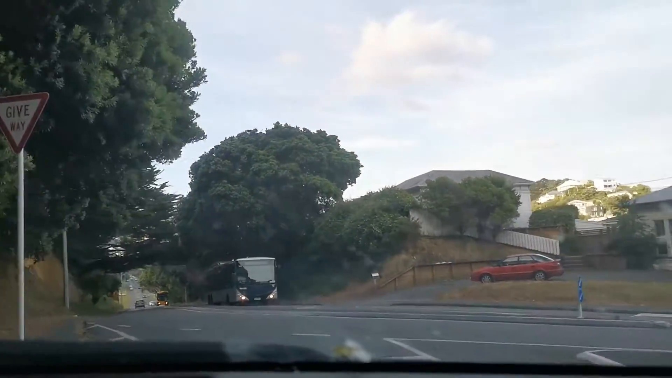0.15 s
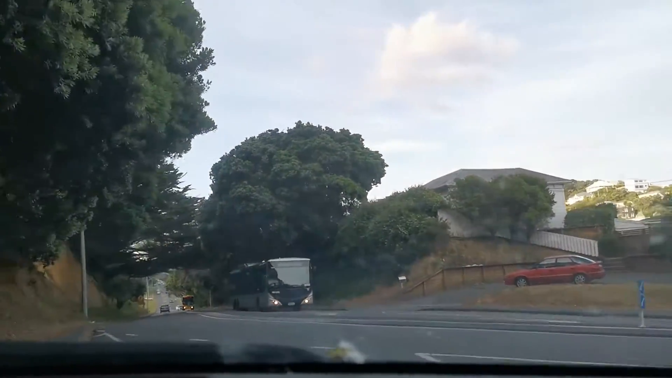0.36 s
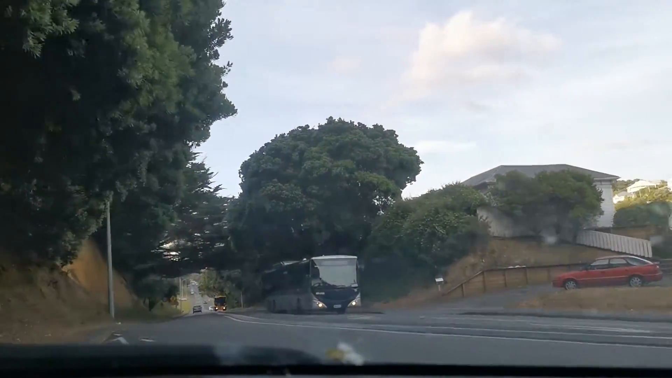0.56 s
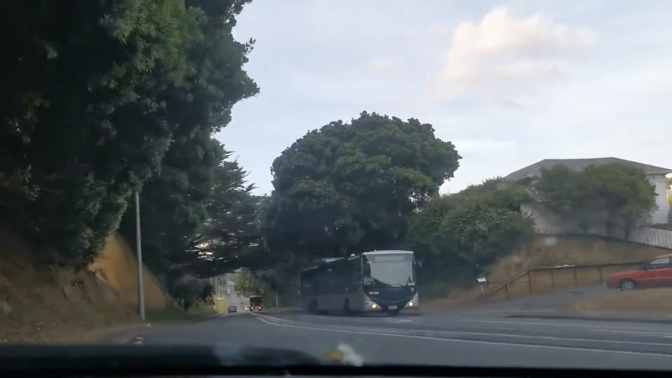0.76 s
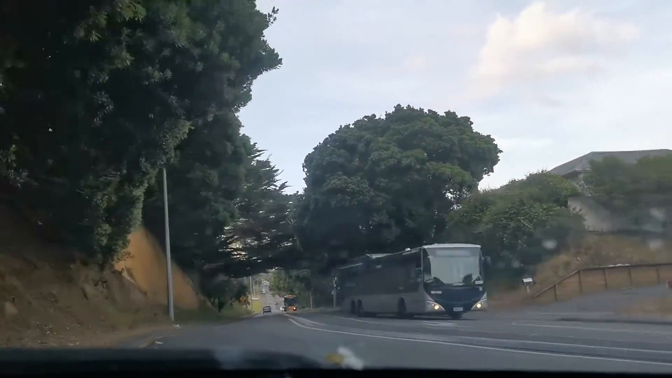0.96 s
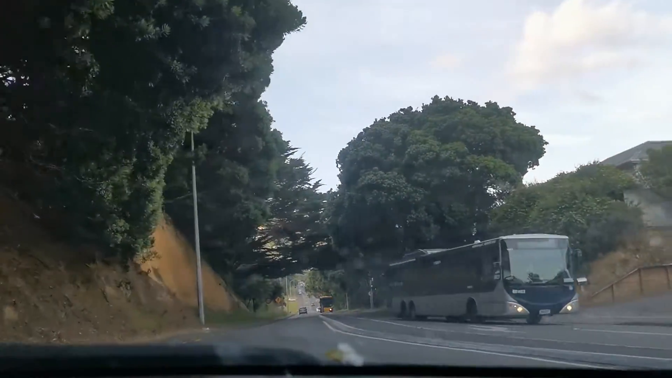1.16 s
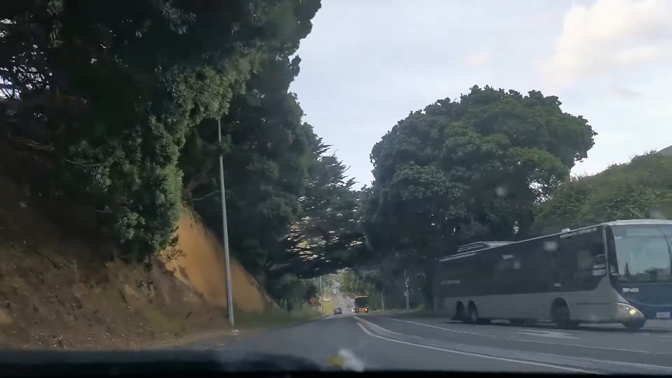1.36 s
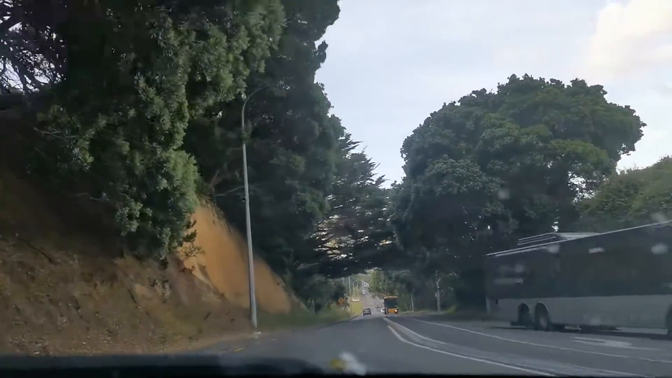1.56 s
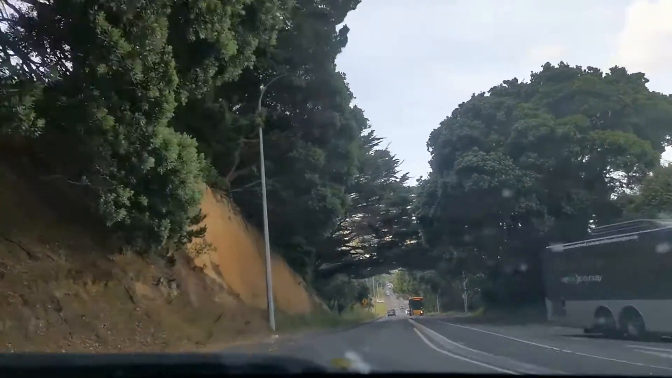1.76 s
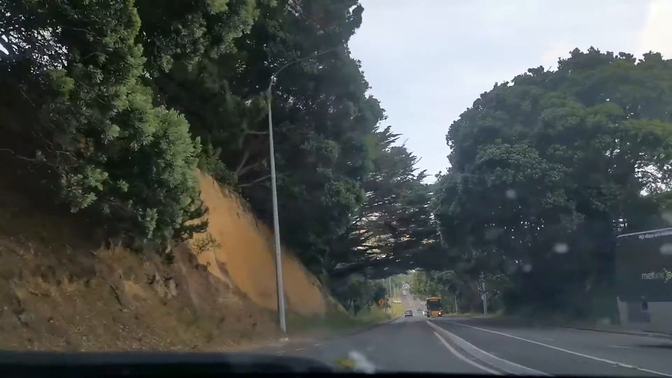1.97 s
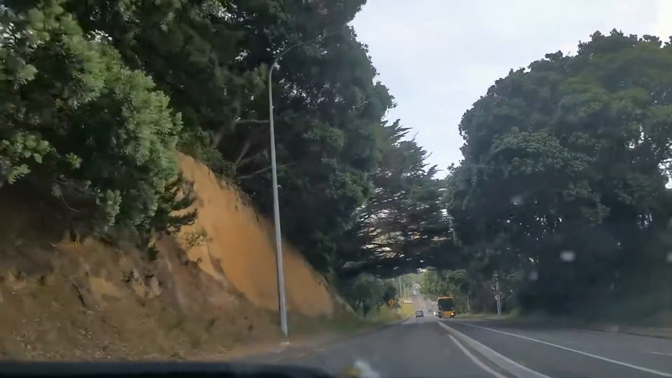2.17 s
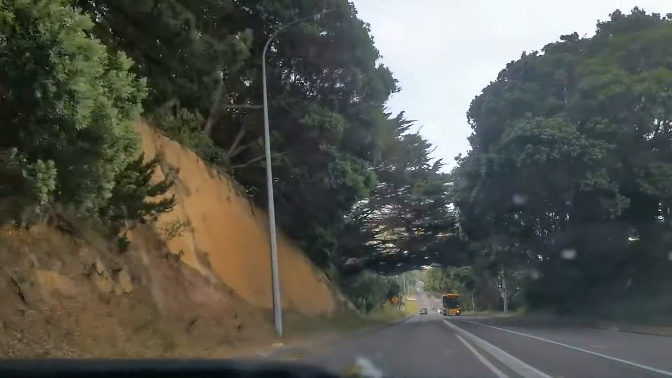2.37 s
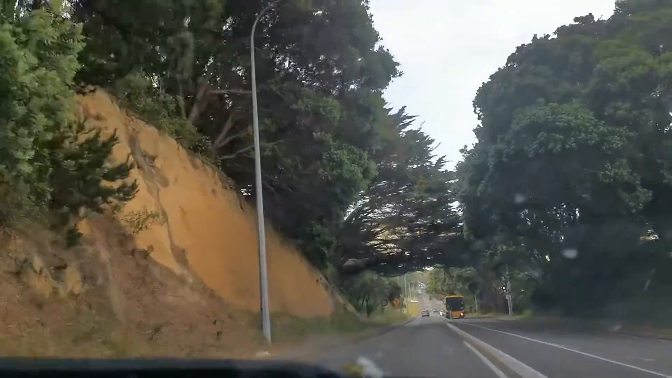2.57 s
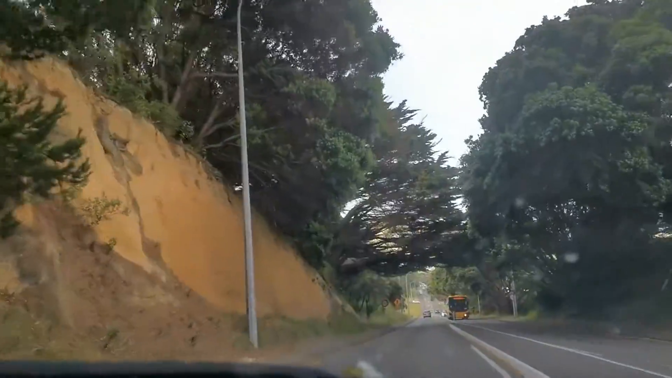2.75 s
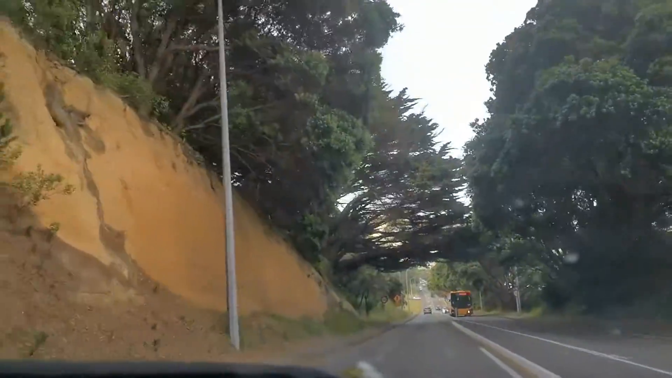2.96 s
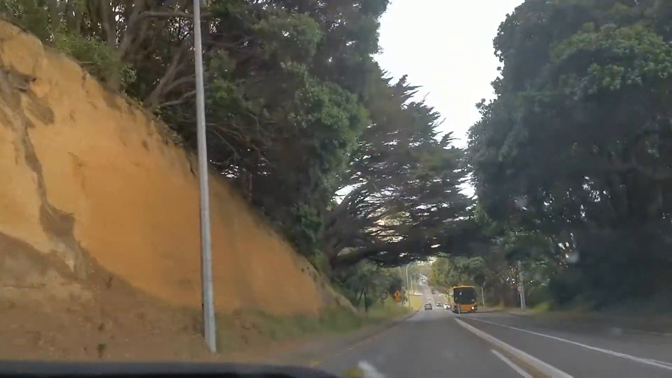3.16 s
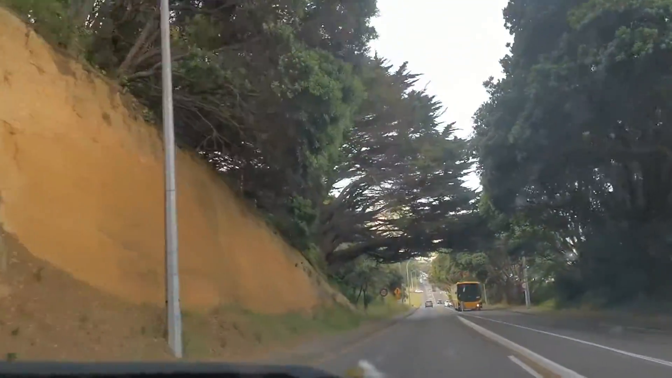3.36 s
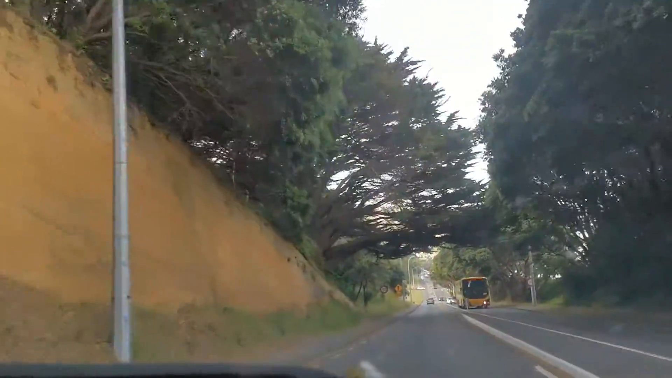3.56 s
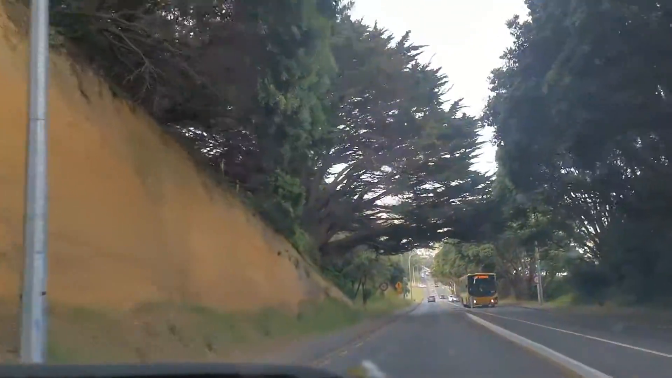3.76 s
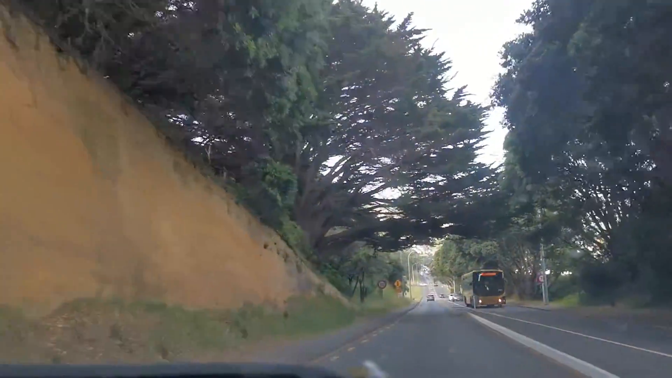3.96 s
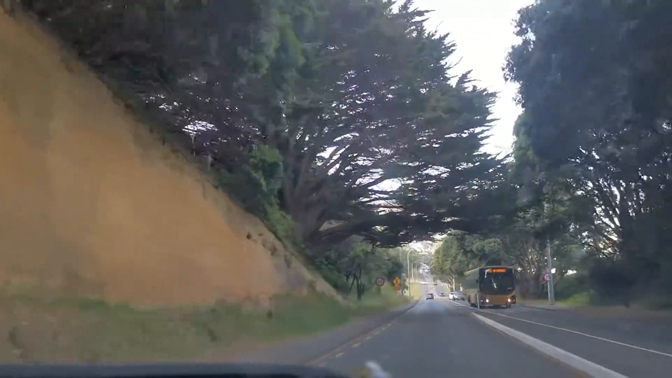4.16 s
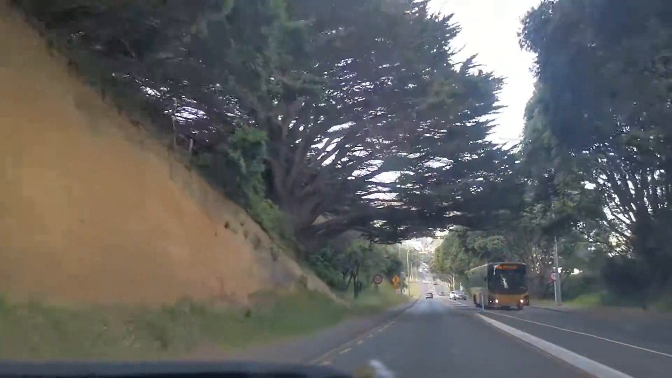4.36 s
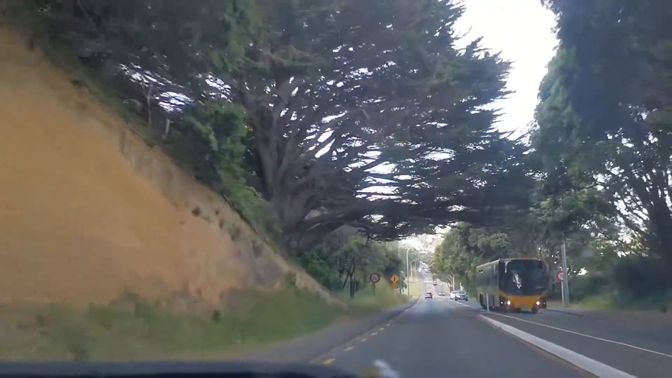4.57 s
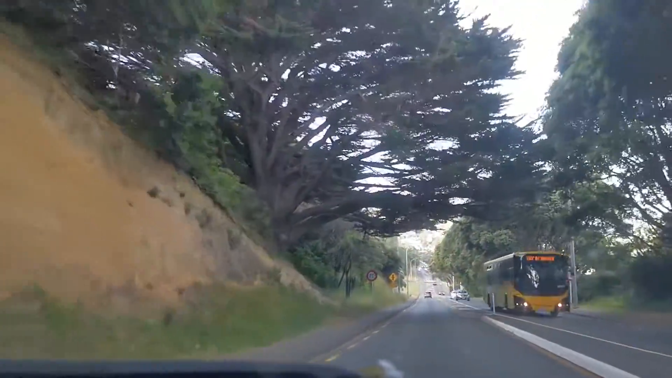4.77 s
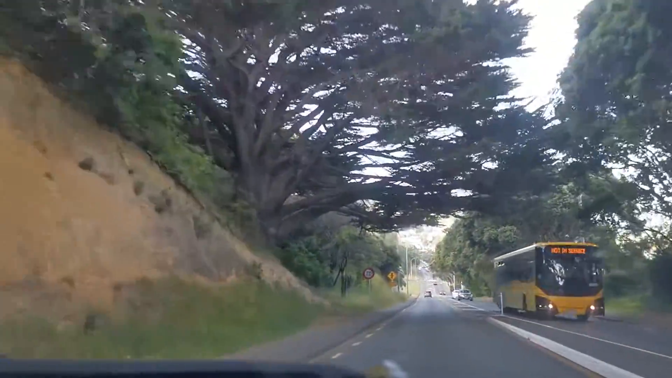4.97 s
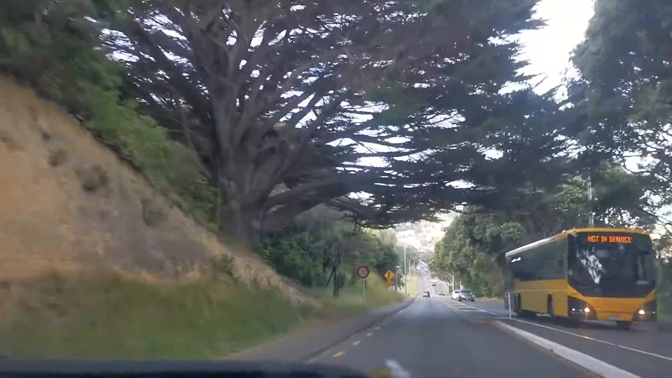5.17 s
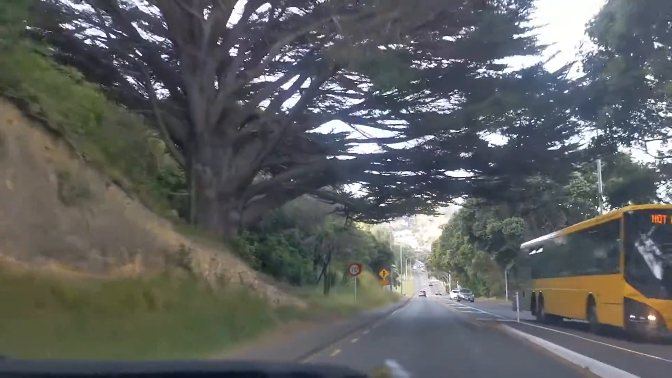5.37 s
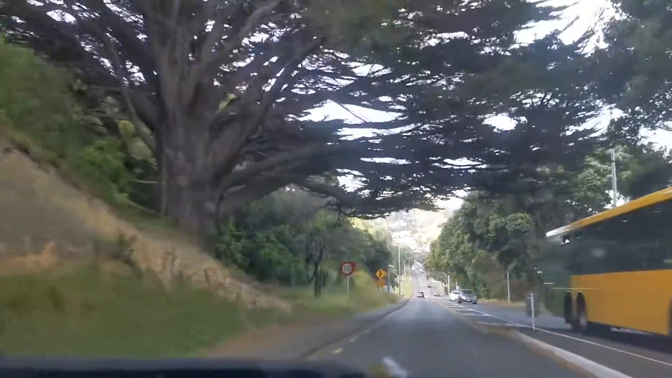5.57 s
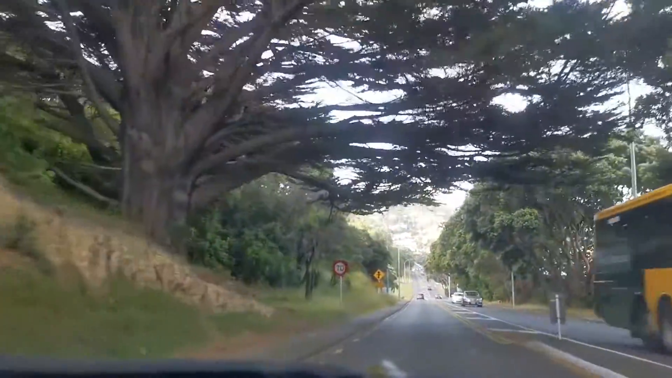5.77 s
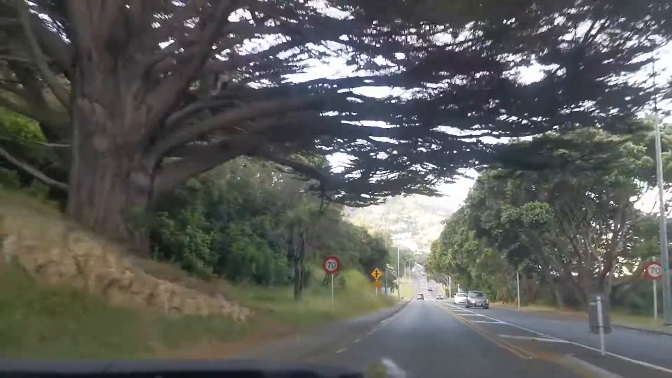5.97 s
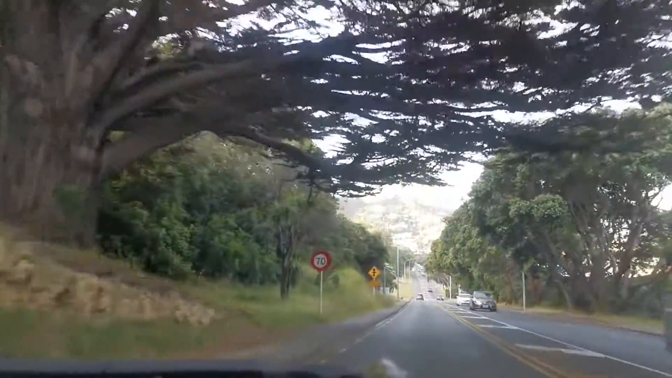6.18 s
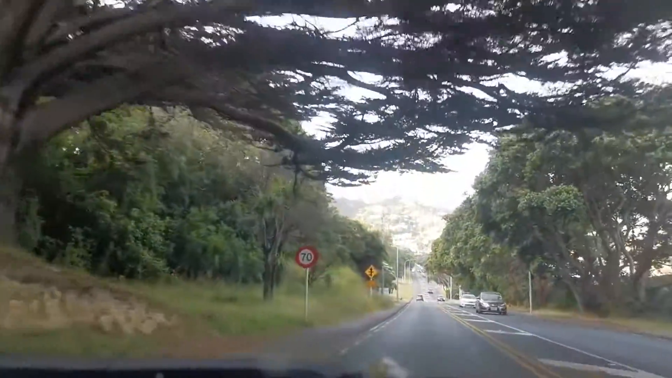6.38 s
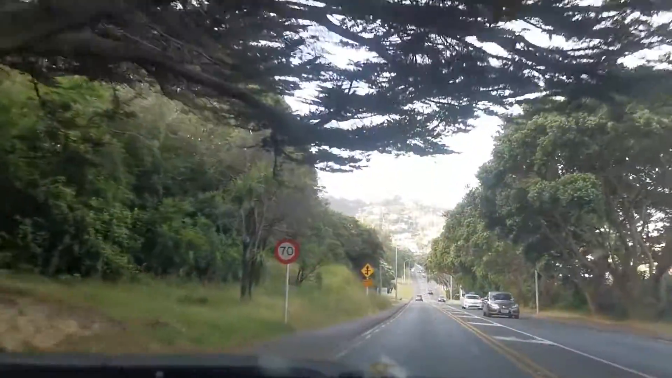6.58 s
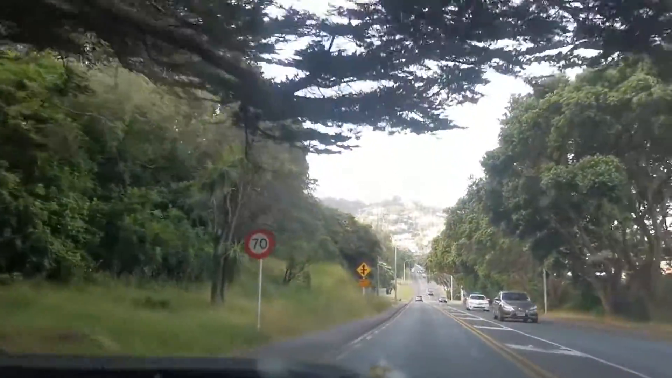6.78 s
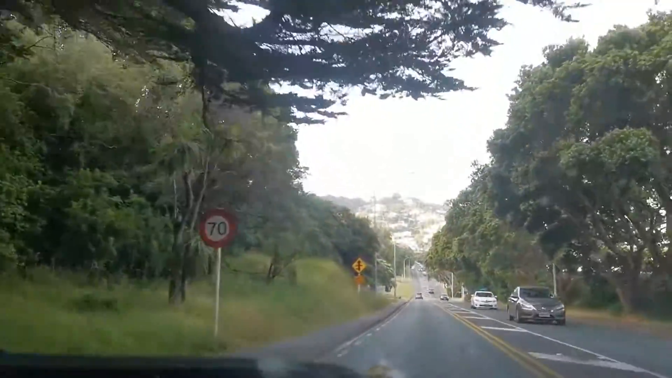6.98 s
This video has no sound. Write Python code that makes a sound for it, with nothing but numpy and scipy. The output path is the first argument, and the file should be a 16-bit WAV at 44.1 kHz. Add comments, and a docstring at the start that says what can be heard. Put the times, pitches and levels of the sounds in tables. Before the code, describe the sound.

Cabin sound heard from behind the windscreen: bassy road noise with gentle airy hiss thickens as the car gathers speed. First come quiet, steady indicator ticks and a quick plastic double snap, then a short rattling clatter as the stalk returns. Afterwards only driving remains, with a low motor-like hum swelling twice, a hollow tyre drone in the middle, bumps in the rumble and tiny loose trim clicks.

```python
"""Road noise fills a car that gathers speed: filtered noise in bands, swelling over rough patches of tarmac.
Wind, tread and vent hiss are brighter noise; drive hum, gear whine and tyre cavity are wavering tones and
narrow noise, with a low body boom. Relay ticks, a plastic catch, the clattering indicator stalk and loose trim
are ringing modes and noise bursts. It is heard through two close microphone ports behind the windscreen."""
import sys
import numpy as np
from scipy import signal
from scipy.fft import rfft, irfft, next_fast_len
from scipy.io import wavfile

SR = 44100
rng = np.random.default_rng(int(sys.argv[2]) if len(sys.argv) > 2 else 0)


def waveform_to_disk(signal):
    """Save audio, clipped to [-1, 1], as 16-bit WAV at the path in sys.argv[1]."""
    frames = np.transpose(np.atleast_2d(signal))
    scaled = np.clip(frames, -1, 1) * 32767
    samples = np.round(scaled).astype(np.int16)
    wavfile.write(sys.argv[1], SR, samples)


N = 310023  # samples, about 7 s

# Parts of the road noise: bounce, boom, drone and tyre roar; their summed power sets the road level.
# Each row: centre in Hz, level at speed in dB, how much quieter at rest in dB, build-up time in seconds.
ROAD_PARTS = [(35, -26, 2, 1.4), (100, -26.5, 10.5, 1.9), (192, -23.5, 6, 2.7), (550, -39.5, 11, 2.2)]
# Tone colour of the road noise. Each row: frequency in Hz, relative density in dB per Hz.
ROAD_COLOUR = [(12, -30.5), (20, 0), (31, 4), (50, 0.5), (63, -1.5), (88, -1), (105, -7), (140, -5.5),
               (172, -9), (230, -11), (320, -18.5), (380, -25), (600, -31.5), (770, -36.5), (890, -38.5),
               (1300, -52), (2200, -75)]
# Rougher and smoother patches of tarmac. Each row: centre in seconds, length in seconds,
# then the lift in dB of bounce, boom, drone and tyre roar.
TARMAC_PATCHES = [(0.029, 0.19, 4, 6.5, 0, 2), (0.257, 0.092, -6.5, -3.5, -3, -0.5),
                  (0.689, 0.5, 5.5, -1.5, 0.5, 2), (1.005, 0.099, -6, -3.5, 3, 1),
                  (1.153, 0.14, -2, 1.5, 2, 4.5), (1.415, 0.11, 9, 3.5, -0.5, 1),
                  (1.661, 0.099, 10, -5, 1.5, 1.5), (2.351, 0.1, 4, 9.5, 2, 0),
                  (2.622, 0.21, 3.5, 4.5, -2.5, 1.5), (3.258, 0.092, 3, -4, 0.5, -0.5),
                  (3.58, 0.13, 6, 1, 2, -1), (3.972, 0.13, 2.5, -4.5, -4, 1),
                  (4.272, 0.23, 3, 2, 2.5, -0.5), (4.703, 0.2, 0.5, 2.5, 1.5, -0.5),
                  (5.245, 0.081, 6, -4, 3, 0), (5.532, 0.057, 4.5, 10.5, 7.5, -1),
                  (5.714, 0.24, 3.5, 12.5, -4.5, -2.5), (6.013, 0.13, 6.5, 9.5, 0.5, 0.5),
                  (6.388, 0.1, 5, 4.5, 2, 0.5), (6.573, 0.043, 0, -6.5, -1, 0),
                  (6.752, 0.21, 1.5, 5.5, 6, -1), (6.947, 0.19, 8, 0, -1, -0.5)]
# How alike the noise is at the two ports. Each row: frequency in Hz, left-right correlation from 0 to 1.
PORT_LIKENESS = [(40, .996), (250, .994), (500, .97), (1000, 0.75), (1900, .8), (2400, .3), (3000, .5),
                 (4000, 0.25), (8000, 0.0)]

# Course of the wind and tread hiss. Each row: time in seconds, level in dB, treble lift in dB.
HISS_COURSE = [(0.0, -64.5, 0.5), (0.7, -63.5, 7.8), (0.99, -58, 1), (3.1, -60, 3.6), (4.09, -56.5, -1.8),
               (5.17, -54.5, 1), (5.56, -56.5, -4.2), (5.89, -57.5, -1.7), (6.32, -56.5, -0.2),
               (7.0, -56.5, -2.1)]
# Tone colour of the wind and tread hiss. Each row: frequency in Hz, relative density in dB per Hz.
HISS_COLOUR = [(700, -33.5), (1100, -1), (1250, -3), (1420, 0), (1620, -3), (1900, -1), (2100, -4.5),
               (2330, -9.5), (2800, -8), (3600, -14), (4300, -16.5), (5200, -21), (7000, -33),
               (12000, -56.5)]
# Tone colour of the vent hiss. Each row: frequency in Hz, relative density in dB per Hz.
VENT_COLOUR = [(2000, -25), (4000, -2), (5700, 2.5), (7000, 1), (9000, -5), (12000, -8), (15000, -12)]
TREBLE_FROM_HZ = 2300
VENT_DB, VENT_FADE_DB_PER_S = -79.3, 0.4

# Ring of the relay pulling in. Each row: frequency in Hz, relative level in dB, t60 in seconds.
RELAY_IN_MODES = [(1330, 4, 0.0081), (2230, 0.5, 0.025), (3000, 2, 0.0091), (3330, -4, .01),
                  (3610, 3, 0.018), (3770, 1.5, 0.017), (5730, -11, 0.022), (6480, -12, 0.016),
                  (7400, -35, 0.012), (7610, -15, 0.011)]
# Ring of the relay dropping out. Each row: frequency in Hz, relative level in dB, t60 in seconds.
RELAY_OUT_MODES = [(2240, 1, 0.014), (2600, 8, 0.018), (2980, 8, 0.0086), (3300, 7.5, 0.011),
                   (3570, -4, 0.013), (3930, 1, 0.015), (7640, -24, 0.013), (7620, -11, 0.013)]
RELAY_START_S, RELAY_STEP_S, RELAY_TICKS = 0.1193, 0.3427, 5
RELAY_IN_DB, RELAY_OUT_DB = -44, -43.5  # reference levels; each layer is offset from them
CONTACT_S = 0.003  # a blow builds up as fast as a ring of this t60 dies

# Snaps of a plastic catch. Each row: time in seconds, reference level in dB, treble over bass in dB.
CATCH_SNAPS = [(0.2375, -21.5, 13), (0.262, -20.5, -13.5)]
# Ring of the catch. Each row: frequency in Hz, relative level in dB, t60 in seconds.
CATCH_MODES = [(1490, -16, 0.026), (1810, -7.5, 0.012), (2360, -6, .01), (2690, -2, 0.015),
               (2910, 3, 0.019), (3140, 1, 0.013), (4020, -13, 0.0054), (4770, -2, 0.011),
               (5300, -13, 0.0068), (6230, 1, 0.009), (6560, -3, 0.0098), (7700, -9, 0.014)]

# Ticks of loose trim. Each row: time in seconds, reference level in dB.
TRIM_TICKS = [(0.368, -58), (0.7654, -59), (1.234, -54.5), (1.394, -53.5), (1.596, -55), (1.9789, -59),
              (2.0627, -56), (2.28, -58), (2.352, -62), (3.512, -57), (3.7576, -60), (3.8221, -53),
              (3.848, -58), (3.9049, -60), (3.9736, -64), (4.121, -58), (4.394, -61), (4.6691, -61),
              (5.3653, -60), (5.4, -63), (5.404, -61.5), (5.455, -67.5), (5.531, -62), (5.5363, -57),
              (5.5698, -60.5), (5.7009, -69), (6.2404, -55.5)]
TRIM_T60_S = 0.009

WHINE_S, WHINE_HZ, WHINE_DB, WHINE_FADE_DB_PER_S = 0.57, 2670, -67.5, 2

# Pulls of the drive. Each row: start in seconds, end in seconds, starting rate in Hz,
# then the level in dB of the first, third and fifth multiple.
HUM_PULLS = [(0.802, 2.384, 125.5, -34.5, -47.5, -51.5), (4.043, 5.052, 143.2, -28, -46.5, -53)]
# Swell-in time in seconds of the first, third and fifth multiple: the higher ones take longer.
HUM_RISE_S = [0.28, 0.48, 0.88]
HUM_HZ, HUM_SETTLE_S, HUM_CREEP_HZ_PER_S = 141.14, 0.15, 3.1
HUM_FALL_S, HUM_DROOP_HZ = 0.15, 6.9
HUM_WAVER_HZ, HUM_FLUTTER_DB = 0.7, 3.2

# The stalk rattling back over its detents. Each row: time in seconds, reference level in dB,
# treble over bass in dB.
STALK_KNOCKS = [(1.6314, -26.5, 3), (1.6484, -19.5, 5), (1.6506, -19.5, 9), (1.655, -27.5, -8),
                (1.6763, -21, 7), (1.6841, -29, 7), (1.692, -24.5, 4), (1.701, -28, -1), (1.713, -26, -3),
                (1.721, -28, -8), (1.733, -34, -10), (1.752, -43.5, -20)]
# Ring of the stalk's plastic. Each row: frequency in Hz, relative level in dB, t60 in seconds.
PLASTIC_MODES = [(1200, -3, 0.015), (1480, 2, 0.015), (1853, 0.5, 0.026), (2180, -2, 0.011),
                 (2980, -4, 0.0066), (3930, -12, 0.0055), (4930, 3, 0.0087), (5530, -11, 0.0061),
                 (6060, -16, 0.006), (6700, -19, .01), (6940, -17, 0.01)]
# The column thumping under each detent. Each row: frequency in Hz, relative level in dB, t60 in seconds.
COLUMN_MODES = [(343, 2.5, 0.052), (390, 4, 0.067), (489, -3, 0.048), (544, -14.5, 0.027), (720, -8, 0.033)]
# loose chatter under the rattle: it rises, holds and dies, quieter by the edge level at both ends
CHATTER_S, CHATTER_RISE_S, CHATTER_HOLD_S, CHATTER_FALL_S = 1.64, 0.02, 0.06, 0.035
CHATTER_DB, CHATTER_EDGE_DB, CHATTER_COUNT = -38, -17, 60

# Drone of the air in the tyre. Each row: time in seconds, pitch in Hz, level in dB.
CAVITY_COURSE = [(1.95, 200.6, -45), (2.1, 197.9, -30), (2.3, 194.4, -33.5), (2.5, 192, -32),
                 (2.6, 192, -33), (2.75, 187.6, -29), (2.95, 191, -24.5), (3.2, 185.8, -27.5),
                 (3.33, 186, -29.5), (3.43, 187.2, -43.5), (3.55, 190, -22), (3.85, 190.6, -23.5),
                 (3.95, 191, -39), (4.15, 195.9, -34.5), (4.4, 195.3, -39), (4.85, 192, -32),
                 (5.05, 190.6, -51)]
BOOM_S, BOOM_END_S, BOOM_HZ, BOOM_DB = 2.43, 5.05, 124.9, -31.5

CABIN_T60_S, CABIN_WET_DB = 0.05, -3.5
CROSS_HZ, CROSS_SHARPNESS, CROSS_DB = 2450, 8.0, 4.5  # air swinging between dash and glass
UNLIKE_LOW_HZ, UNLIKE_HIGH_HZ = 2200, 6500  # the tail differs between the ports mostly in this band
DRIVE_LAG_S, DRIVE_LEFT_DB = 0.00005, 0.85  # left port against right
CLICKS_LAG_S, CLICKS_LEFT_DB = 0.000025, 1.3
PORT_HZ, PORT_SHARPNESS, PORT_DB = 7650, 8, 15
PORT_EDGE_HZ, CUTOFF_HZ = 7570, 15100


def from_db(db):
    """Gain of a level in dB."""
    return 10 ** (np.asarray(db) / 20)


def rms_one(x):
    """Scale a signal to unit rms."""
    return x / np.sqrt(np.mean(x ** 2) + 1e-20)


def in_time(rows):
    """Draw each column of a timed curve as one value a sample."""
    s, *columns = np.transpose(rows)
    return [np.interp(np.arange(N) / SR, s, column) for column in columns]


def at_hz(points, hz):
    """Read a spectrum on a log-frequency axis."""
    point_hz, value = np.array(points).T
    return np.interp(np.log(hz), np.log(point_hz), value)


def drift(rate):
    """Slow random wander of unit rms: noise through two equal poles at the given rate in Hz."""
    step = 40  # samples between the slow values
    r = np.exp(-2 * np.pi * rate * step / SR)
    noise = rng.standard_normal(N // step + 2002)
    slow = signal.lfilter([1], [1, -2 * r, r * r], noise)[2000:]  # drop the filter's run-in
    return np.interp(np.arange(N) / step, np.arange(len(slow)), rms_one(slow))


def noise_bands(spectrum, centres, patchy_db, patch_rate):
    """Split stereo noise, total rms 1, into overlapping bands that then flicker singly; yields (Hz, band)."""
    size = next_fast_len(N)
    hz = np.maximum(np.arange(size // 2 + 1) * SR / size, 1)
    alike = np.clip(at_hz(PORT_LIKENESS, hz), 0, 1)
    mid, side = rfft(rng.standard_normal((2, size))) * from_db(at_hz(spectrum, hz))
    pair = np.sqrt(1 + alike) * mid + np.sqrt(1 - alike) * side * [[1], [-1]]
    pair = pair / np.std(irfft(pair, size))
    for k, centre in enumerate(centres):
        share = np.interp(np.log(hz), np.log(centres), np.arange(len(centres)) == k)
        band = irfft(pair * share, size)[:, :N]
        yield centre, band * from_db(patchy_db * drift(patch_rate))


def road():
    """Tarmac noise builds up and swells on patches; each band follows the two parts nearest in pitch."""
    t = np.arange(N) / SR
    part_hz, speed_db, rest_db, build_s = np.transpose(ROAD_PARTS)
    parts_db = speed_db[:, None] - rest_db[:, None] * np.exp(-t / build_s[:, None])
    for s, length, *lift_db in TARMAC_PATCHES:
        bump = np.exp(-0.5 * (2 * (t - s) / length) ** 2)
        parts_db = parts_db + np.array(lift_db)[:, None] * bump
    power = np.mean(from_db(parts_db) ** 2, axis=1)
    swell_db = parts_db - 10 * np.log10(power)[:, None]
    out = 0
    for hz, band in noise_bands(ROAD_COLOUR, np.geomspace(25, 1000, 12), patchy_db=1.58, patch_rate=7.5):
        weights = [np.interp(np.log(hz), np.log(part_hz), one) for one in np.eye(len(ROAD_PARTS))]
        out = out + band * from_db(weights @ swell_db)
    return out * np.sqrt(power.sum())


def hiss():
    """Wind and tread hiss is broadband noise whose level and treble move along a drawn curve."""
    level_db, treble_db = in_time(HISS_COURSE)
    bands = noise_bands(HISS_COLOUR, np.geomspace(1000, 8000, 8), patchy_db=2.1, patch_rate=1.4)
    return sum(band * from_db(level_db + treble_db * (hz > TREBLE_FROM_HZ)) for hz, band in bands)


def vent():
    """Vent hiss is bright, flickering noise that eases slowly."""
    level_db = VENT_DB - VENT_FADE_DB_PER_S * np.arange(N) / SR
    bands = noise_bands(VENT_COLOUR, np.geomspace(3500, 13000, 6), patchy_db=5.5, patch_rate=11.0)
    return from_db(level_db) * sum(band for hz, band in bands)


def ring(clicks, hz, t60):
    """A two-pole resonator: a unit click sets a dying sine of height about 1 ringing."""
    r, w = np.exp(-np.log(1000) / (t60 * SR)), 2 * np.pi * hz / SR
    return signal.lfilter([0, np.sin(w)], [1, -2 * r * np.cos(w), r * r], clicks + 1e-18)


def click_train(times, levels_db, signs=1):
    """Single-sample clicks at the given times."""
    clicks = np.zeros(N)
    clicks[np.round(np.asarray(times) * SR).astype(int)] = signs * from_db(levels_db)
    return clicks


def strike(times, levels_db, modes, spread_db, tilt_db=0):
    """Every blow rings all modes with fresh strengths and signs; tilt shifts weight to the high modes."""
    out = np.zeros(N)
    for hz, mode_db, t60 in modes:
        sign_draw, strength_draw = rng.normal(0, 1, (2, len(times)))
        brighter_db = tilt_db * np.tanh(np.log(hz / 4000) / 0.12) / 2
        blow_db = levels_db + mode_db + brighter_db + spread_db * strength_draw
        clicks = click_train(times, blow_db, np.sign(sign_draw))
        out += ring(clicks, hz, t60) - ring(clicks, hz, CONTACT_S)  # soft onset
    return out


def crack(times, levels_db, t60, low_hz, high_hz=11000):
    """A burst of band-passed noise swells and dies after each blow."""
    clicks = click_train(times, levels_db) + 1e-18
    fall, rise = [signal.lfilter([1], [1, -np.exp(-np.log(1000) / (s * SR))], clicks)
                  for s in (t60, CONTACT_S)]
    band = signal.butter(2, [low_hz, high_hz], "band", fs=SR, output="sos")
    return signal.sosfilt(band, (fall - rise) * rng.standard_normal(N))


def relay():
    """Indicator relay: pull-in and drop-out alternate at a steady pace, each with its own ring."""
    s = RELAY_START_S + RELAY_STEP_S * np.arange(RELAY_TICKS)
    pull_in, drop_out = s[::2], s[1::2]
    rings = strike(pull_in, RELAY_IN_DB, RELAY_IN_MODES, spread_db=1.2)
    rings = rings + strike(drop_out, RELAY_OUT_DB, RELAY_OUT_MODES, spread_db=0.8)
    return (rings + crack(pull_in, RELAY_IN_DB + 4.0, t60=0.015, low_hz=1100, high_hz=4140)
            + crack(drop_out, RELAY_OUT_DB + 8.0, t60=0.019, low_hz=2000, high_hz=4120)
            + crack(s, RELAY_OUT_DB - 2.5, t60=0.024, low_hz=6900, high_hz=10500))


def catch():
    """A plastic catch snaps twice, ringing its modes under two bands of noise."""
    s, db, tilt_db = np.transpose(CATCH_SNAPS)
    return (strike(s, db - 9.5, CATCH_MODES, spread_db=0.0, tilt_db=tilt_db)
            + crack(s, db - 7.0 - 0.12 * tilt_db, t60=0.058, low_hz=1390, high_hz=3750)
            + crack(s, db - 6.5 + 0.083 * tilt_db, t60=0.03, low_hz=3770, high_hz=10800))


def trim():
    """Loose trim gives thin dry ticks: short bursts of treble noise."""
    s, db = np.transpose(TRIM_TICKS)
    return crack(s, db + 9.5, TRIM_T60_S, low_hz=4000, high_hz=14500)


def gate(start, end, rise, fall):
    """One between start and end, with straight ramps inside both edges."""
    t = np.arange(N) / SR
    return np.clip(np.minimum((t - start) / rise, (end - t) / fall), 0, 1)


def blurred(hz, blur_hz):
    """Noise narrowed to a band around a moving pitch, rms about 1."""
    wander = drift(blur_hz) + 1j * drift(blur_hz)
    return np.real(wander * np.exp(2j * np.pi * np.cumsum(hz) / SR))


def whine():
    """A faint gear whine: narrow noise around a wandering pitch, fading steadily."""
    t = np.arange(N) / SR
    level = from_db(WHINE_DB - WHINE_FADE_DB_PER_S * (t - WHINE_S))
    level = level * gate(WHINE_S, N / SR, rise=0.33, fall=0.19)
    return level * blurred(WHINE_HZ + 45 * drift(1.7), blur_hz=90.0)


def tone(hz, levels_db, multiples, waver_hz, flutter_db):
    """Sines on multiples of a wavering rate, each fluttering in level."""
    phase = 2 * np.pi * np.cumsum(hz + waver_hz * drift(6.6)) / SR
    return sum(np.sqrt(2) * from_db(db + flutter_db * drift(5.9)) * np.sin(k * phase)
               for k, db in zip(multiples, levels_db))


def hum():
    """Drive hum on odd multiples: each pull swells in, glides to a working rate, creeps up and droops."""
    t, out = np.arange(N) / SR, 0
    for start, end, from_hz, *levels_db in HUM_PULLS:
        since = np.maximum(t - start, 0)
        glide_hz = (from_hz - HUM_HZ) * np.exp(-since / HUM_SETTLE_S)
        droop = np.clip(1 - (end - t) / (HUM_FALL_S + HUM_SETTLE_S), 0, 1) ** 2
        hz = HUM_HZ + glide_hz + HUM_CREEP_HZ_PER_S * since - HUM_DROOP_HZ * droop
        swell_db = [db + 20 * np.log10(gate(start, end, rise, HUM_FALL_S) + 1e-9)
                    for db, rise in zip(levels_db, HUM_RISE_S)]
        out = out + tone(hz, swell_db, [1, 3, 5], waver_hz=HUM_WAVER_HZ, flutter_db=HUM_FLUTTER_DB)
        # a blurred halo round the top multiple
        out = out + from_db(swell_db[-1] - 4.0) * blurred(5 * hz, blur_hz=8.9)
    return out


def stalk():
    """The stalk clatters over its detents: plastic snaps, column thumps and a loose chatter."""
    s, db, tilt_db = np.transpose(STALK_KNOCKS)
    thump = strike(s, db - 9.0, COLUMN_MODES, spread_db=1.5)
    corners = CHATTER_S + np.cumsum([0, CHATTER_RISE_S, CHATTER_HOLD_S, CHATTER_FALL_S])
    loose = rng.uniform(corners[0], corners[-1], CHATTER_COUNT)
    loose_db = CHATTER_DB + CHATTER_EDGE_DB * np.interp(loose, corners, [1, 0, 0, 1])
    loose_db = loose_db + 3.0 * rng.standard_normal(CHATTER_COUNT)
    # detents and chatter share the same plastic
    s, db, tilt_db = np.append(s, loose), np.append(db, loose_db), np.append(tilt_db, 0 * loose)
    return (thump + strike(s, db - 14.5, PLASTIC_MODES, spread_db=3.0, tilt_db=tilt_db)
            + crack(s, db - 4.0 - tilt_db / 2, t60=0.015, low_hz=790, high_hz=3000)
            + crack(s, db - 2.0 + tilt_db / 2, t60=0.0074, low_hz=2980, high_hz=10400))


def cavity():
    """Air ringing in the tyre: a wavering drone with a blurred halo."""
    hz, db = in_time(CAVITY_COURSE)
    drone = tone(hz, [db], [1], waver_hz=0.81, flutter_db=1.2)
    halo = from_db(db - 9.5) * blurred(hz, blur_hz=9.0)
    return gate(CAVITY_COURSE[0][0], CAVITY_COURSE[-1][0], rise=0.07, fall=0.038) * (drone + halo)


def body_boom():
    """A low body resonance, narrow noise round a wandering pitch, comes and goes."""
    boom = from_db(BOOM_DB) * blurred(BOOM_HZ + 2.405 * drift(1.67), blur_hz=3.6)
    return gate(BOOM_S, BOOM_END_S, rise=0.19, fall=0.12) * boom


def cabin(x, t60, wet_db):
    """A dense quick tail, alike at both ports in the bass, and a cross resonance of opposite sign at each."""
    t = np.arange(int(0.15 * SR)) / SR
    tail = rng.standard_normal((2, len(t))) * np.exp(-np.log(1000) * t / t60) * (t > 0.001)
    tail = tail / np.sqrt(np.sum(tail ** 2, axis=1, keepdims=True))
    mid, side = from_db(wet_db) * signal.fftconvolve(x[None], tail, axes=1)[:, :N]
    unlike = signal.butter(1, [UNLIKE_LOW_HZ, UNLIKE_HIGH_HZ], "band", fs=SR, output="sos")
    side = signal.sosfilt(unlike, side)
    cross = signal.lfilter(*signal.iirpeak(CROSS_HZ, CROSS_SHARPNESS, fs=SR), x + mid + 1e-18)
    shared = x + mid - 0.45 * cross  # the resonance is also thinned out of both ports alike
    return shared + (side + from_db(CROSS_DB) * cross) * [[1], [-1]]


def ports(pair, lag_s, left_db):
    """Sound reaches the left port a little later and louder."""
    left, right = pair
    left = np.interp(np.arange(N) - lag_s * SR, np.arange(N), left)
    return np.array([left * from_db(left_db / 2), right * from_db(-left_db / 2)])


def scene():
    """Mix all sources at the two ports; only the clicks get the cabin tail."""
    clicks = cabin(relay() + catch() + trim() + stalk(), t60=CABIN_T60_S, wet_db=CABIN_WET_DB)
    drive = road() + hiss() + vent() + whine() + hum() + cavity() + body_boom()
    return ports(drive, DRIVE_LAG_S, DRIVE_LEFT_DB) + ports(clicks, CLICKS_LAG_S, CLICKS_LEFT_DB)


def record(dry):
    """The port resonates in the treble and holds back the sound above its edge; the top is cut."""
    port = signal.lfilter(*signal.iirpeak(PORT_HZ, PORT_SHARPNESS, fs=SR), dry)
    low_pass = signal.butter(8, PORT_EDGE_HZ, fs=SR, output="sos")
    high_pass = signal.butter(8, PORT_EDGE_HZ, "high", fs=SR, output="sos")
    below = signal.sosfilt(low_pass, dry + from_db(PORT_DB) * port)
    above = from_db(-8.0) * signal.sosfilt(high_pass, dry)
    top_cut = signal.ellip(10, 0.2, 70, CUTOFF_HZ, fs=SR, output="sos")
    return signal.sosfilt(top_cut, below + above)


dry = scene()
out = record(dry)
waveform_to_disk(out)
```